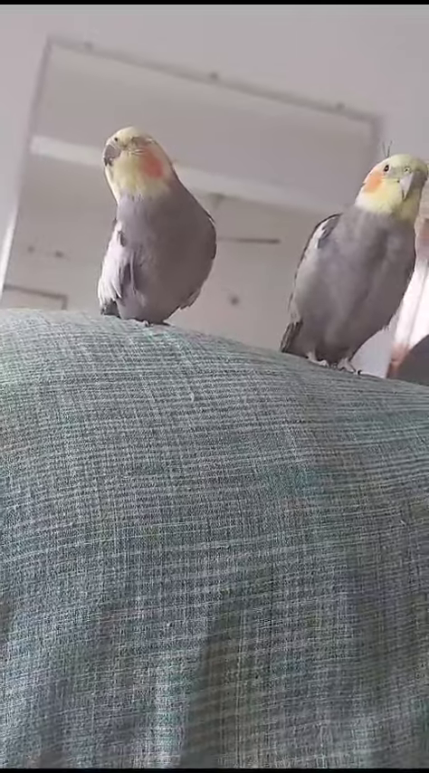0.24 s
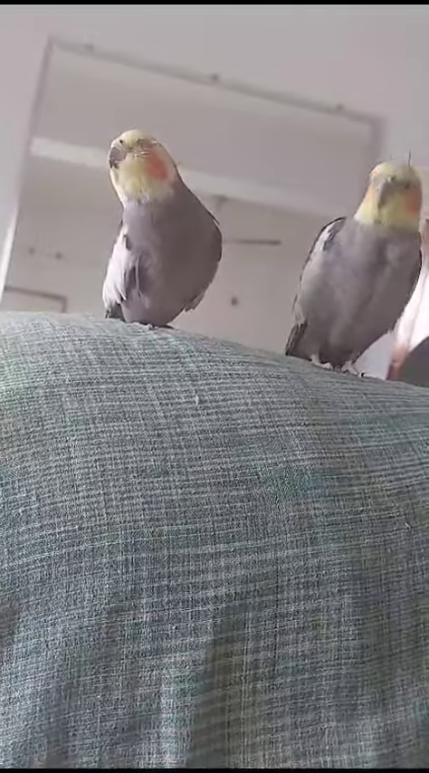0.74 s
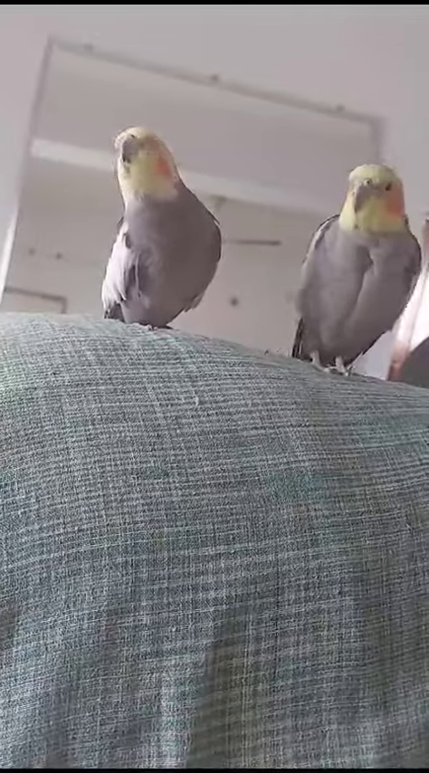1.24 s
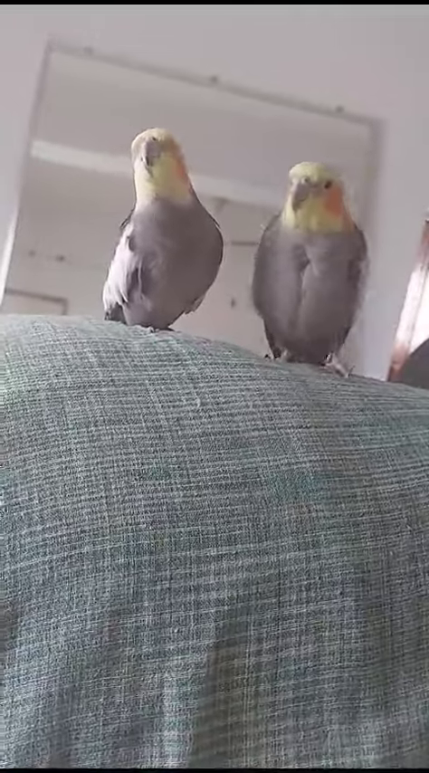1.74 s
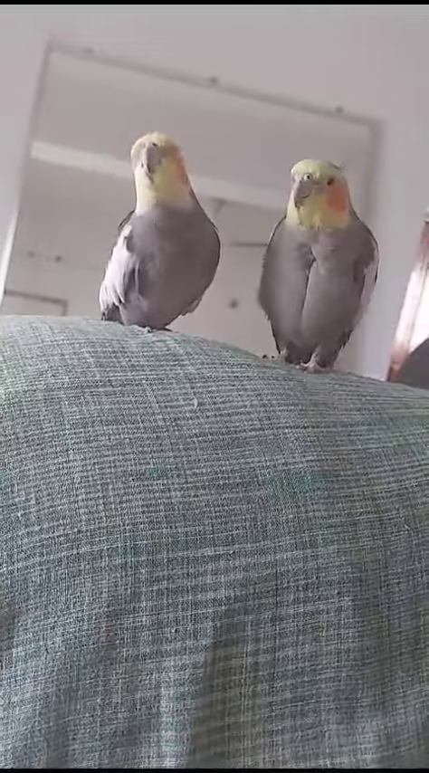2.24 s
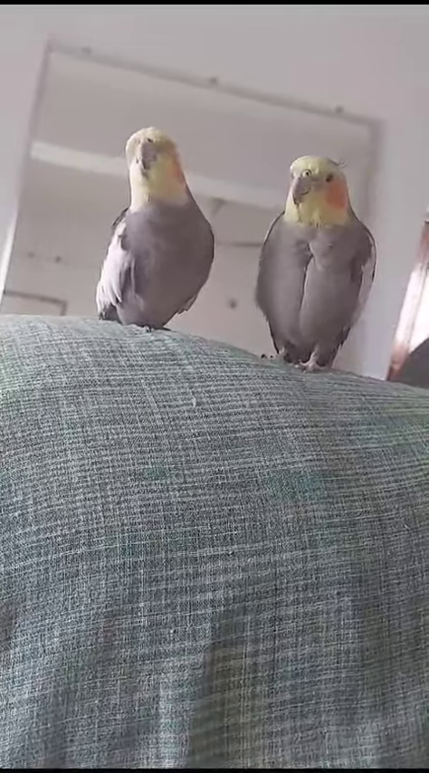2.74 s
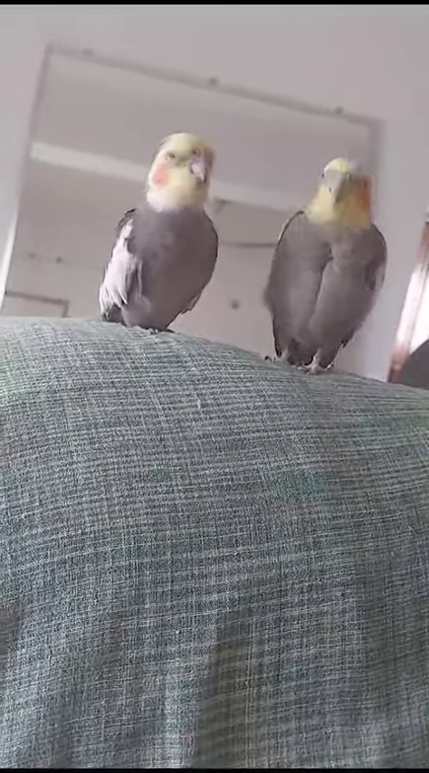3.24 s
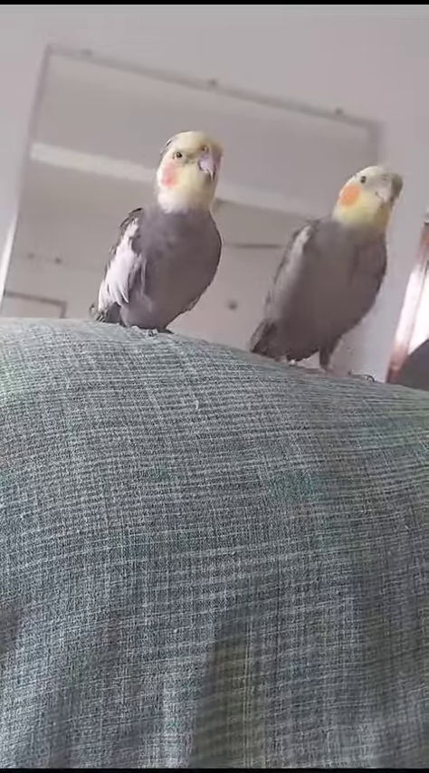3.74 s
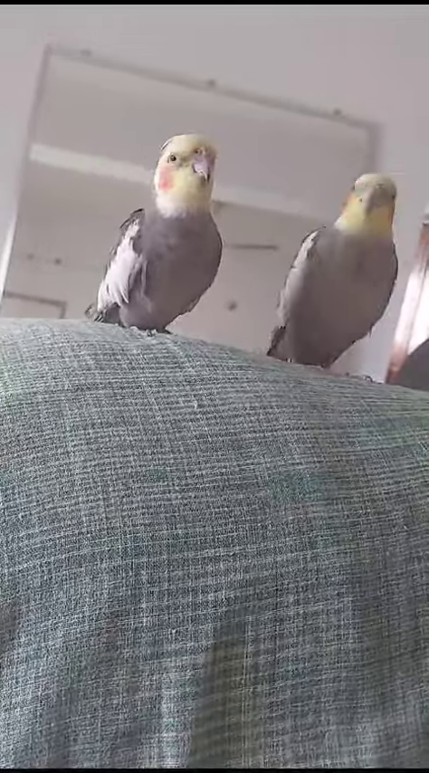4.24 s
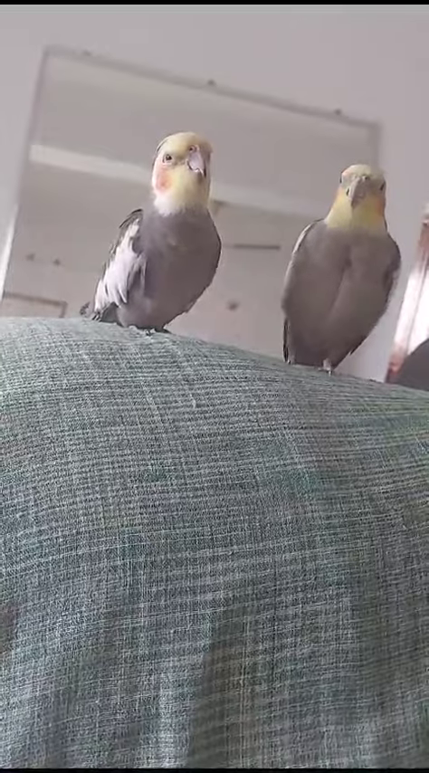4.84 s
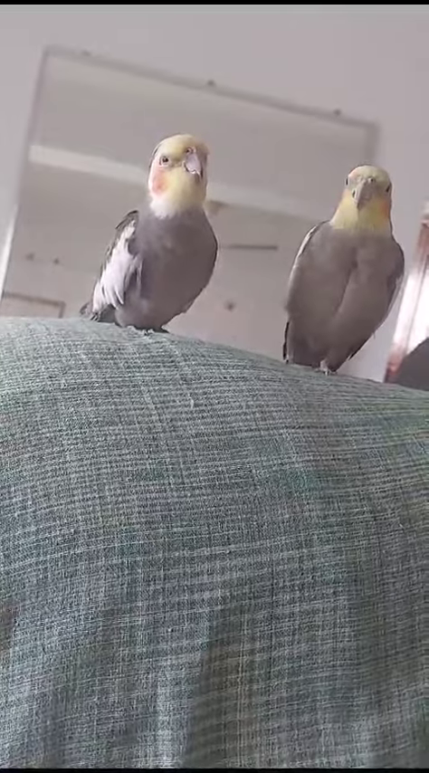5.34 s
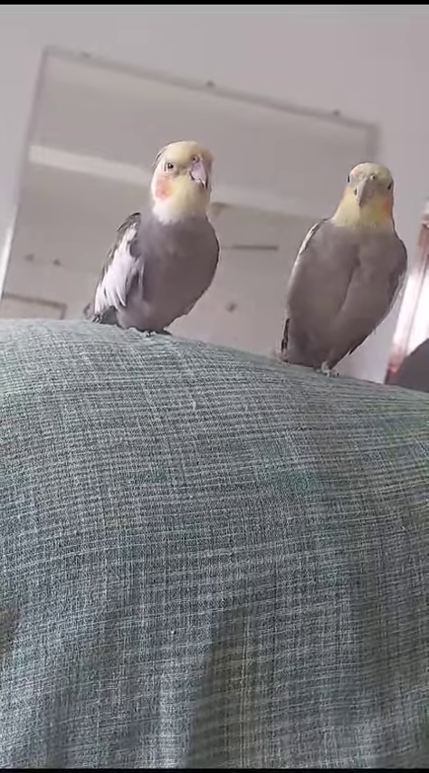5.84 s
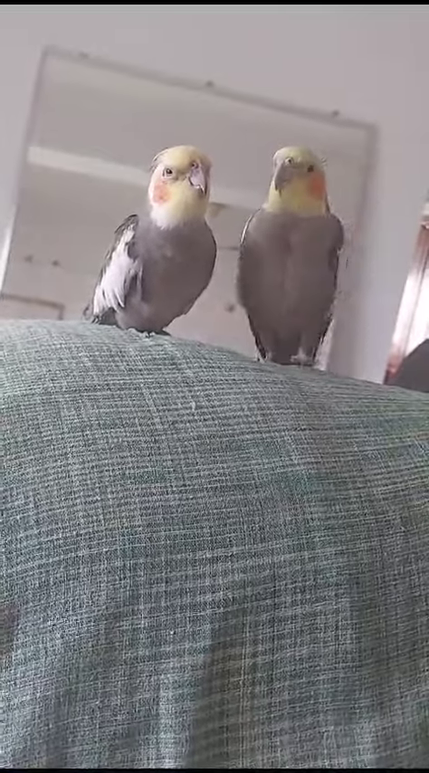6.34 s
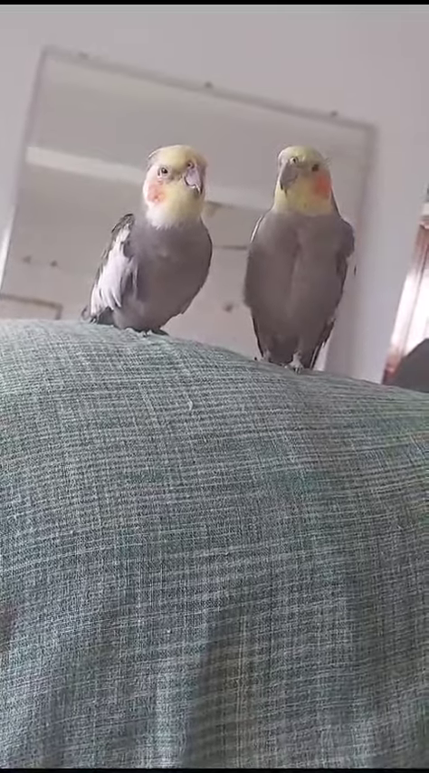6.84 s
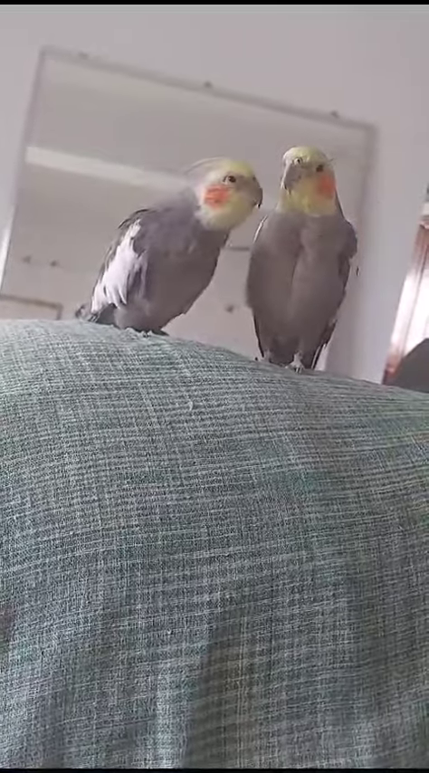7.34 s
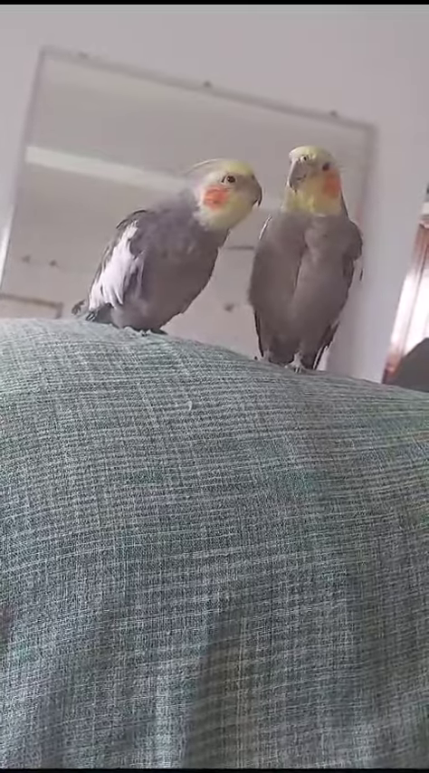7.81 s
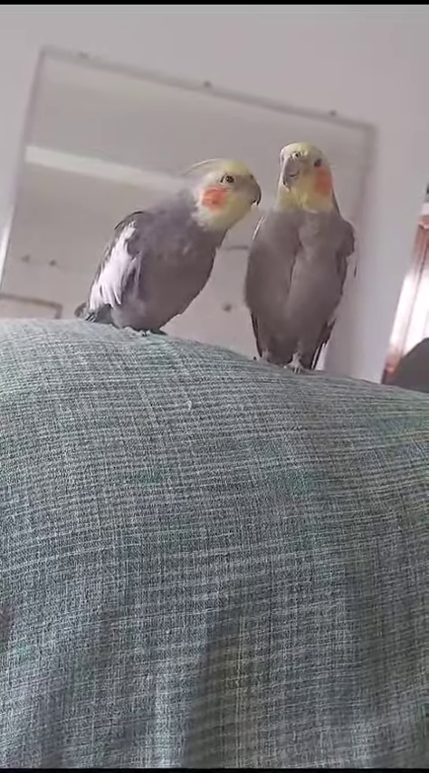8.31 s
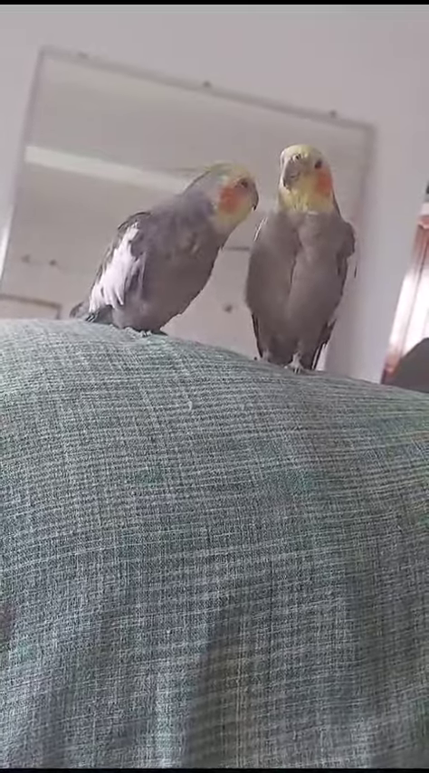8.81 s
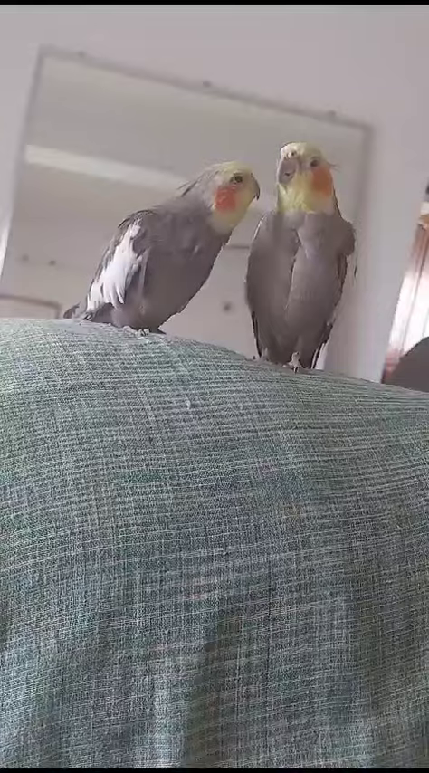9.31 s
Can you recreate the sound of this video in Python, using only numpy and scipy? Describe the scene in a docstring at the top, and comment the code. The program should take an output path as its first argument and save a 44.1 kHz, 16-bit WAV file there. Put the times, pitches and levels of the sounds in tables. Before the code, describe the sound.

In a bare, reverberant room, a fan runs throughout: broad airy rush, unsteady low hum and a faint narrow whine. Its draught makes soft, low thumps, separate in each microphone, heaviest near 4.7 and 6.8-7.1 seconds; smooth high hiss sits above. A nearby cockatiel whistles almost pure notes with ringing echoes. From 0.5 to 2.3 seconds come seven short chirps, mostly sliding up, one a tiny tick. At 2.4 a longer whistle rises, then falls low. After a pause, chirps resume at 3.4, with a bending, wavering whistle at 4.2 and a brief rising one at 5.0. Slides follow at 5.3-5.9, a low short note at 6.2 and a broken, arching whistle at 6.5. More chirps run from 7.4, a falling whistle at 8.3, a low note at 8.7, a rising slide at 8.9, and final short notes at 9.3 and 9.5.

```python
"""A cockatiel whistles short sliding notes, and some longer bending ones, in a bare, ringing room.
Each note is a nearly pure tone with a few partials; it is heard by two microphone ports and rings on as echo.
A fan hums with unsteady blade tones over a broad rush of noise.
Its draught buffets each port in low lumps of noise, and the microphones add a smooth hiss."""
import sys
import numpy as np
from scipy import signal
from scipy.fft import rfft, irfft, next_fast_len
from scipy.io import wavfile
from scipy.ndimage import uniform_filter1d, map_coordinates

SR = 44100
rng = np.random.default_rng(int(sys.argv[2]) if len(sys.argv) > 2 else 0)


def materialize(psi):
    """Save the field psi as 16-bit PCM at rate SR to the path in sys.argv[1].

    A 1-D psi becomes a single channel; in a 2-D psi each row is a channel.
    """
    bounded = np.clip(np.atleast_2d(psi).T, -1, 1)
    quanta = np.round(bounded * 32767).astype(np.int16)
    wavfile.write(sys.argv[1], SR, quanta)


N = 422037

# How the steady background noise rises and falls, before a fixed lift given where it is used.
# Each row: time in seconds, fan rush level in dB, microphone hiss level in dB.
BACKGROUND_LEVELS = [(0, -49.5, -62.5), (.82, -45.5, -60), (3.1, -52, -65.5), (4.1, -47, -62),
                     (5.65, -50.5, -63.5), (7.4, -45.5, -61), (8.8, -50, -63.5), (9.57, -48, -62.5)]


def amp(db):
    """Turn decibels into a plain gain."""
    return 10 ** (np.asarray(db) / 20)


def unit(x):
    """Scale a signal to an rms of 1."""
    return x / np.sqrt(np.mean(x ** 2) + 1e-20)


def along(points, hz, axis=1):
    """Read one column of (Hz, value, ..) points at any frequency, on a log axis."""
    cols = np.transpose(points)
    return np.interp(np.log(hz + 1), np.log(cols[0] + 1), cols[axis])


def curves(rows):
    """Join the points of each column after the time into one value per sample."""
    s, *cols = np.transpose(rows)
    return [np.interp(np.arange(N) / SR, s, col) for col in cols]


def wobble(rate, size=N):
    """A smooth random curve through `rate` random points a second."""
    knots = rng.standard_normal(int(size * rate / SR) + 4)
    return map_coordinates(knots, [np.arange(size) * rate / SR])


def filtered(x, response):
    """Multiply the spectrum of x by a (possibly complex) response of frequency."""
    m = next_fast_len(x.shape[-1] + 8192)  # spare room at the end for filter tails
    spectrum = rfft(x, m) * response(np.fft.rfftfreq(m, 1 / SR))
    return irfft(spectrum, m)[..., :x.shape[-1]]


def sides(db):
    """Left and right gains for a left-over-right difference in dB."""
    return amp([db / 2, -db / 2])


def rush(spectrum, alike, patchy_db):
    """Stereo noise of rms 1: patches of random gain, a colour, and a set likeness of left and right."""
    z = signal.stft(rng.standard_normal((2, N)), nperseg=512)[2]
    field = uniform_filter1d(rng.standard_normal(z.shape[1:]), 5, 0)  # smooth over frequency
    field = uniform_filter1d(field, 12, 1)  # then over time
    pair = signal.istft(z * amp(patchy_db * unit(field)), nperseg=512)[1][:, :N]

    def colour_and_width(hz):
        # more of the shared middle makes the sides alike, more of the difference makes them opposite
        turn = np.arccos(np.clip(along(alike, hz), -1, 1)) / 2
        return amp(along(spectrum, hz)) * [np.cos(turn), np.sin(turn)]

    mid, side = filtered(pair, colour_and_width)
    return unit(np.array([mid + side, mid - side]))


def swells(rows):
    """Smooth bumps from (middle in seconds, length in seconds, peak in dB), added in power."""
    out = np.zeros(N + SR)
    for s, length, db in rows:
        swell = np.hanning(round(length * SR)) ** 1.5
        at = max(round((s - length / 2) * SR), 0)
        out[at:at + len(swell)] = np.hypot(out[at:at + len(swell)], amp(db) * swell)
    return out[:N]


def fan():
    """Broad air noise under tones at multiples of a slowly drifting blade rate, each with its own phases."""
    # The blade tones. Each row: multiple of the blade rate, relative level in dB at the start, at the end.
    blade_tones = [(4, -6, -11), (5, 0, -5.5), (6, -10.5, -10.5), (7, -4, -12.5), (8, -0.5, -1.5),
                   (9, -12.5, 3), (10, -16.5, -14), (12, -5.5, -4), (13, -4, -7)]
    # Speed of the fan. Each row: time in seconds, blade rate in Hz.
    blade_rate = [(0, 85.93), (3, 86.63), (9.57, 84.3)]
    # Colour of the rush. Each row: frequency in Hz, relative level in dB per Hz.
    rush_colour = [(130, -26), (200, -30.5), (271, -12), (335, -9), (430, -7), (552, -9), (704, -5.5),
                   (898, -9.5), (1250, -8), (2070, -11.5), (3600, -22), (3850, -23.5), (5300, -27.5),
                   (5900, -35.5), (7500, -42), (9500, -87.5)]
    # Width of the rush. Each row: frequency in Hz, likeness of left and right (1 the same, 0 unrelated).
    rush_alike = [(250, 0.2), (640, 0.73), (1400, 0), (3100, 0.2), (6800, 0)]
    # Balance of the rush. Each row: frequency in Hz, left over right in dB.
    rush_balance = [(220, 7.5), (380, 0), (5000, 0)]
    # A narrow whine in the rush: middle in Hz, distance in Hz at which the boost halves, boost in dB.
    whine_hz, width_hz, whine_db = (3400, 110, 6)

    blade_hz = curves(blade_rate)[0] * (1 + 0.0014 * wobble(4))
    turns = 2 * np.pi * np.cumsum(blade_hz) / SR
    tones = np.zeros((2, N))
    for k, first_db, last_db in blade_tones:
        level_db = np.linspace(first_db, last_db, N) + 3.94 * wobble(10)
        phases = rng.uniform(0, 2 * np.pi) + 0.67 * rng.standard_normal((2, 1))  # one for each port
        tones += amp(level_db) * np.sin(k * turns + phases)

    def colour(hz):
        boost_db = whine_db / (1 + ((hz - whine_hz) / width_hz) ** 2)
        return amp(boost_db) * sides(along(rush_balance, hz))

    air = filtered(rush(rush_colour, rush_alike, patchy_db=1.1), colour)
    air = amp(0.9 * wobble(8)) * air
    rush_db = curves(BACKGROUND_LEVELS)[0] + 3.0
    return amp(rush_db) * (air + amp(-8) * tones)


def draught():
    """Turbulent air thumps each port on its own; the sharpest lumps also flap higher up."""
    # The draught on the open right port. Each row: time in seconds, level in dB before the port gains.
    buffet_levels = [(0.0, -56), (0.16, -41), (0.38, -61), (0.6, -47), (1.15, -37), (1.36, -58),
                     (1.5, -43.5), (2.9, -44), (3.04, -53.5), (3.1, -43.5), (4.1, -45.5), (4.24, -55),
                     (4.35, -46), (5.18, -41), (5.33, -57.5), (5.56, -44.5), (7.1, -39.5), (9.57, -44)]
    # The strongest gusts, which reach the sheltered left port too.
    # Each row: middle in seconds, length in seconds, peak in dB before the port gains.
    gust_rows = [(1.075, 0.14, -45), (1.2, 0.18, -43), (2.224, .08, -42), (2.77, 0.17, -41),
                 (3.24, .25, -47.5), (3.64, 0.14, -42.5), (4.09, 0.45, -38), (4.73, .125, -33),
                 (5.18, 0.079, -37), (5.635, .1, -41.5), (6.27, 0.13, -41.5), (6.77, 0.2, -34),
                 (6.99, .115, -31.5), (7.09, 0.11, -32.5), (7.5, 0.089, -36.5), (8.0, .23, -43.5),
                 (8.137, .13, -39), (8.595, .21, -38.5), (9.135, 0.1, -43.5)]
    # Colour of the low thumps. Each row: frequency in Hz, relative level in dB per Hz.
    thump_colour = [(20, -15), (59, 2), (80, 5), (190, -11), (400, -21.5), (650, -56)]
    # Colour of the flapping. Each row: frequency in Hz, relative level in dB per Hz.
    flap_colour = [(70, -36), (130, -2.5), (260, -3), (450, -12.5), (800, -52.5)]
    puff_count, puff_s, puff_spread_db = 24, 0.1, 3.5  # puffs on the left: number, length, scatter

    buffet_db, gusts = curves(buffet_levels)[0], swells(gust_rows)
    # one puff at a random moment in each equal share of the time
    at = ((np.arange(puff_count) + rng.uniform(size=puff_count)) * N / puff_count).astype(int)
    puffs = swells([(i / SR, puff_s, buffet_db[i] + puff_spread_db * rng.standard_normal()) for i in at])
    lumps, flutter = wobble(13), np.array([wobble(30), wobble(30)])

    def port_levels(lumpy_db):
        left = np.hypot(gusts, puffs)
        right = np.hypot(gusts, amp(buffet_db) * unit(amp(lumpy_db * lumps)))
        return np.array([left, right])

    thump_noise = unit(amp(1.2 * flutter) * rush(thump_colour, [(30, -0.12)], patchy_db=2.5))
    flap_noise = unit(amp(4.5 * flutter) * rush(flap_colour, [(200, 0.0072)], patchy_db=2.5))
    thump = port_levels(lumpy_db=4.5) * thump_noise
    flap = port_levels(lumpy_db=8) * flap_noise
    return amp([[2.5], [0]]) * thump + amp([[-5], [-9]]) * flap  # dB gains: left port, right port


def hiss():
    """Smooth microphone noise, different in each port and stronger in the right one."""
    # Colour of the hiss. Each row: frequency in Hz, relative level in dB per Hz.
    hiss_colour = [(5500, -26.5), (7260, -22.5), (8100, -4.5), (9400, -1.5), (15600, -0.5)]
    # Balance of the hiss. Each row: frequency in Hz, left over right in dB.
    hiss_balance = [(8100, -13.5), (15000, -3.5)]
    colour = lambda hz: amp(along(hiss_colour, hz)) * sides(along(hiss_balance, hz))
    noise = filtered(rng.standard_normal((2, N)), colour)
    level_db = curves(BACKGROUND_LEVELS)[1] + 4.5 + 0.6 * wobble(4.2)
    return amp(level_db) * unit(noise)


def song():
    """List every note as the beak's opening and a course of (seconds, pitch in Hz, effort in dB)."""
    # The short notes: a slide in, a held part, an ending.
    # Each row: start in seconds, lengths of slide, hold and ending in seconds, pitch in Hz at first,
    # after the slide, after the hold and at last, effort in dB at the end of the hold,
    # then the beak's opening: change in dB of the second partial, the third, the higher ones.
    short_notes = [ (0.493, 0.084, .048, .016, 1440, 2036, 2206, 2400, 2.5, 5, -3, 1),
                   (0.847, 0.0098, .012, 0.0073, 2150, 1960, 1920, 1750, -1, 2, 2, 5),
                   (1.048, .014, 0.063, 0.023, 1750, 2425, 2200, 2439, 0.5, 0.5, -2.5, -12),
                   (1.322, 0.034, .05, 0.022, 2240, 2372, 2350, 2687, 1.5, -3, 6, 1),
                   (1.574, 0.075, 0.036, 0.026, 1850, 2291, 2340, 2514, 0.5, -3.5, 3.5, -6.5),
                   (1.888, 0.03, 0.059, 0.026, 1900, 2270, 2290, 2389, -0.5, -3.5, 7, -4),
                   (2.182, 0.013, .045, .04, 2140, 2380, 2542, 2856, 2, -1, -4, -4.5),
                   (3.426, 0.1, .064, 0.0064, 1520, 1805, 2448, 2560, -2.5, 3.5, -3, -4),
                   (3.76, 0.0089, .016, 0.0074, 2200, 2220, 1730, 1620, -4.5, 6, -6, -2),
                   (3.935, .02, 0.051, .018, 2054, 2406, 2395, 2495, -0.5, 1, -6, -2),
                   (4.754, 0.02, .042, .02, 2240, 2467, 2377, 2720, 0, 0, -10, -9),
                   (5.318, .012, .034, 0.016, 2300, 2384, 2424, 1960, -6, 4.5, 4, 3),
                   (5.561, 0.031, .062, 0.016, 1700, 2120, 2197, 2405, -1.5, -1.5, 5, 5),
                   (5.862, 0.14, .032, .02, 1400, 2377, 2284, 1704, -1, 2, 1, 8),
                   (6.213, 0.043, 0.024, .012, 1490, 1500, 1365, 1270, -0.5, 0, -9, 0),
                   (7.39, .081, .05, .018, 1420, 2037, 2226, 2473, 3, -2.5, 3.5, -5.5),
                   (7.688, 0.023, .006, 0.004, 1860, 2070, 1990, 2090, -0.5, -2, 4, 2),
                   (7.877, 0.016, .056, .018, 2160, 2452, 2322, 2284, 1, 3, -6, -9),
                   (8.119, 0.049, .075, 0.027, 1480, 2027, 2365, 2050, 2.5, -2.5, 2, 1),
                   (8.651, 0.046, .02, .022, 1226, 1270, 1290, 1190, -0.5, -7.5, -4, -3),
                   (8.902, .134, 0.077, .022, 1292, 1684, 2050, 1790, -1.5, -5, 4, 2),
                   (9.303, 0.043, .033, 0.015, 2270, 2368, 2226, 2390, -1, -2, -8, -20),
                   (9.541, .008, 0.011, 0.018, 1520, 1560, 1630, 1770, 1, 2, 6, 0), ]
    # The longer, bending whistles. Each row: the beak's three changes in dB as above,
    # then the course as points of time in seconds, pitch in Hz, effort in dB.
    bending_notes = [ ((-1.5, 4.3, 0.97), [(2.43, 1786, 1), (2.448, 1770, -2.5), (2.498, 2332, -1),
                     (2.56, 2510, -1), (2.582, 2420, -17.5), (2.61, 2264, -7.5), (2.678, 1502, -5.5),
                     (2.75, 1318, -4.5), (2.81, 1245, -4.5)]), ((-2.9, 2.5, 9.1), [(4.21, 1647, -0.5),
                     (4.27, 2230, 0.5), (4.332, 2237, 4.5), (4.37, 2594, -8.5), (4.398, 2538, -1.5),
                     (4.428, 2406, 0.5), (4.45, 2381, -4), (4.47, 2298, -7), (4.55, 2168, -1.5),
                     (4.574, 2524, -5)]), ((-5, 0.9, 2), [(5.002, 1420, -4.5), (5.024, 1880, -2),
                     (5.078, 2310, -1.5), (5.102, 2313, 1.5), (5.126, 2483, -11), (5.14, 2620, -11.5)]),
                     ((-4, 1.6, 4), [(6.455, 1295, 8), (6.478, 1346, -2), (6.572, 1700, -0.5),
                     (6.586, 1830, -7.5), (6.6, 1830, 6), (6.625, 1862, -8.5), (6.656, 1922, 3),
                     (6.684, 1812, -8.5), (6.752, 1333, 0.5), (6.835, 1214, 0)]), ((3, 0.79, 3),
                     [(8.318, 2310, -2), (8.35, 2270, -10), (8.358, 2106, -21), (8.372, 1660, -9.5),
                     (8.42, 1364, 0), (8.438, 1256, -12)]), ]
    # short notes grow until the end of the hold, then let go
    shape_db = np.array([-1, -0.5, 0, -3.5])
    short = []
    for row in short_notes:
        course = np.transpose([np.cumsum(row[:4]), row[4:8], row[8] + shape_db])
        short.append((row[9:], course))
    return short + bending_notes


def whistle(rows, beak_db):
    """A nearly pure gliding tone; its partials, weighed by throat and beak, set in late and come and go."""
    # The whistle carries best near the windpipe's resonance.
    # Each row: pitch in Hz, level in dB before the effort is added.
    pitch_loudness = [(1250, -38), (1550, -33.5), (1850, -33.5), (2050, -25), (2250, -21), (2400, -16),
                      (2600, -20), (2850, -18)]
    # Second to sixth partial of the syrinx, the bird's voice organ: level in dB before throat and beak.
    syrinx_partials = [-9.5, -13.5, -25.5, -25.5, -26]
    # Throat and microphone together. Each row: frequency in Hz, relative gain in dB.
    throat_gain = [(1200, -6.5), (1800, -10.5), (2400, -0.5), (3200, -14), (3800, -19.5), (4600, -22),
                   (5400, -28.5), (6100, -35), (7000, -49), (9500, -33), (12500, -22.5), (15500, -27.5)]
    corner_s, attack_s, release_s = 0.006, 0.017, 0.004  # pitch turning, onset and fade, in seconds
    sunk_db = -19.5  # dulling of partials one octave under the note's top so far, growing with the square

    s, pitch, effort = np.transpose(rows)
    t = np.arange(s[0], s[-1], 1 / SR)
    size = len(t)
    glide = uniform_filter1d(np.interp(t, s, pitch), round(corner_s * SR), mode="nearest")
    raspy = s[-1] - s[0] < 0.045 and pitch[-1] < pitch[0]  # the briefest falling ticks are hoarse
    hz = glide * (1 + 0.0053 * wobble(150.7, size=size) + 0.07 * raspy * wobble(900, size=size))
    turns = 2 * np.pi * np.cumsum(hz) / SR
    level_db = along(pitch_loudness, glide) + np.interp(t, s, effort) + 1.3 * wobble(110, size=size)
    dull_db = sunk_db * np.log2(np.maximum.accumulate(glide) / glide) ** 2

    tone = np.sin(turns)
    rise = 1 - np.exp(-(t - s[0]) / attack_s)
    for k, partial_db in enumerate(syrinx_partials, 2):
        throat_db = along(throat_gain, k * hz) - along(throat_gain, hz)  # against the fundamental
        colour_db = throat_db + beak_db[min(k - 2, 2)] + dull_db
        flicker_db = 4 * wobble(50, size=size)
        tone += rise * amp(partial_db + colour_db + flicker_db) * np.sin(k * turns)
    edge = rise * np.clip((s[-1] - t) / release_s, 0, 1)
    return np.sqrt(2) * amp(level_db) * edge * tone


def room():
    """A fresh pair of noise tails: each frequency dies at its own speed, after the way to the nearest wall."""
    # The ringing. Each row: frequency in Hz, seconds to fall by 60 dB, level in dB before the echo's balance.
    ringing = [(1180, 0.71, -8.5), (1860, 0.72, 1.5), (2380, 1, -9), (4500, .45, -8), (12000, 0.32, -17)]
    hz, t, z = signal.stft(rng.standard_normal((2, SR * 3 // 4)), SR, nperseg=256)
    decay = amp(-60 * t / along(ringing, hz)[:, None])
    level = amp(along(ringing, hz, axis=2)) / np.linalg.norm(decay, axis=1)  # same energy however long
    decay *= level[:, None]
    tail = signal.istft(z * decay, SR, nperseg=256)[1] / np.sqrt(128)  # 128 samples per noise frame
    return np.pad(tail, ((0, 0), (round(0.008 * SR), 0)))  # 8 ms before the first echo


def cockatiel():
    """Every note reaches the two ports directly, at differing level and phase, and then rings in the room."""
    # The direct sound at the ports. Each row: frequency in Hz, left over right in dB, left lead in radians.
    port_differences = [(1200, 0, 1.79), (1800, 4.5, 2.01), (2307, -0.5, 1.21), (2462, -6.5, 2.31),
                        (4450, 2.5, 0.41), (7000, -6.5, 2), (13000, 0.5, 1.8)]
    direct, echo = np.zeros(N + SR), np.zeros((2, N + 2 * SR))
    for beak_db, rows in song():
        note, at = whistle(rows, beak_db), round(rows[0][0] * SR)
        direct[at:at + len(note)] += note
        wet = signal.fftconvolve(note[None], room(), axes=1)
        echo[:, at:at + wet.shape[1]] += wet

    def ports(hz):
        lead = along(port_differences, hz, axis=2)
        phase = np.exp(np.outer([0.5j, -0.5j], lead))  # half the lead on each side
        return sides(along(port_differences, hz)) * phase

    return filtered(direct[:N], ports) + echo[:, :N] * sides(-1)[:, None]


def scene():
    """Fan, draught and bird together at the two ports."""
    return fan() + draught() + cockatiel()


def record(dry):
    """The microphones add their hiss, and nothing is kept above the band limit."""
    top_hz = 15750
    return filtered(dry + hiss(), lambda hz: hz < top_hz)


dry = scene()
out = record(dry)
materialize(out)
```